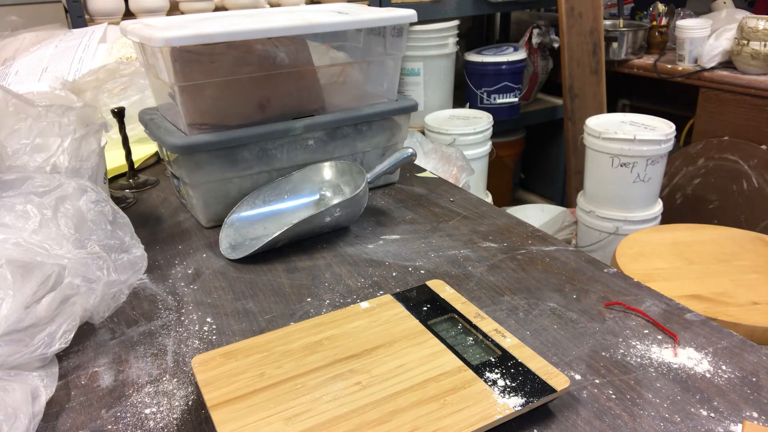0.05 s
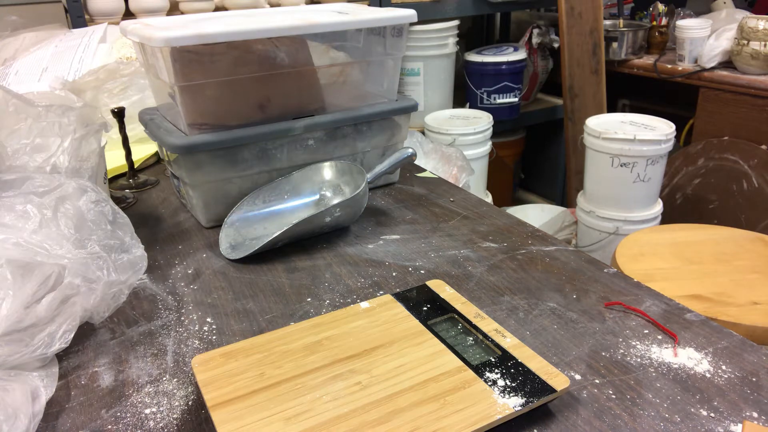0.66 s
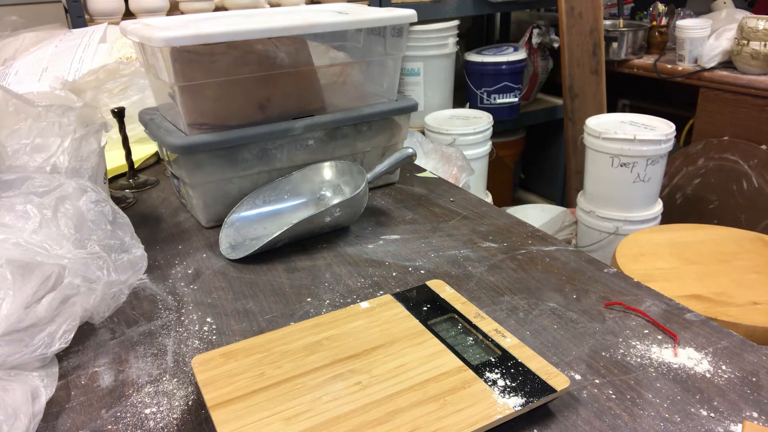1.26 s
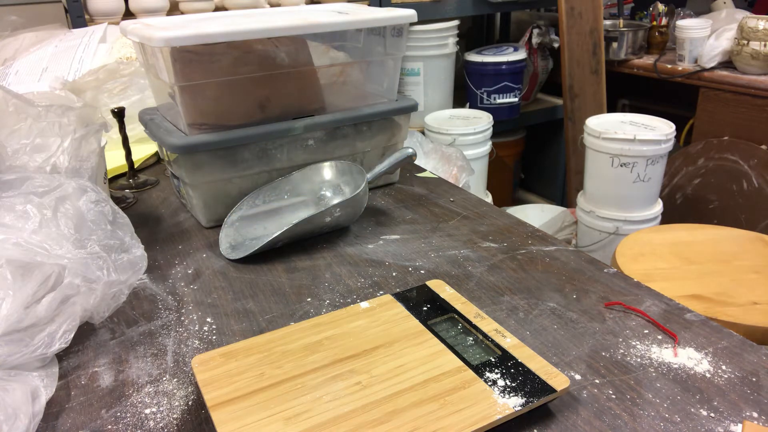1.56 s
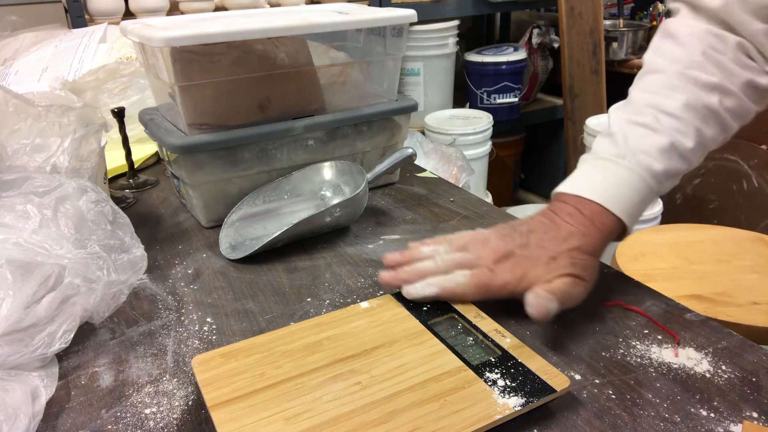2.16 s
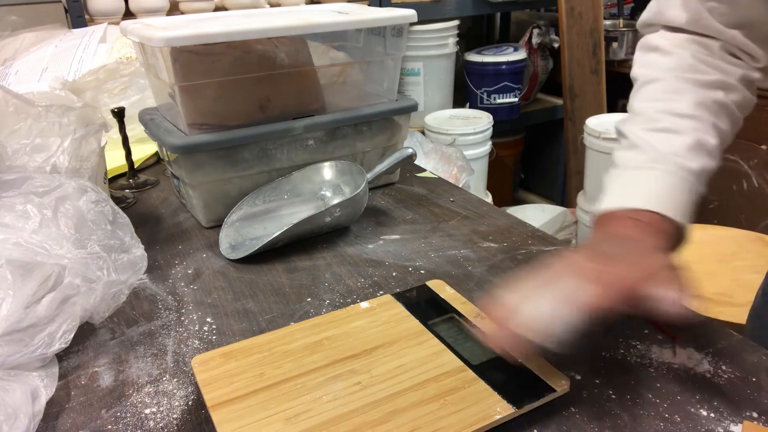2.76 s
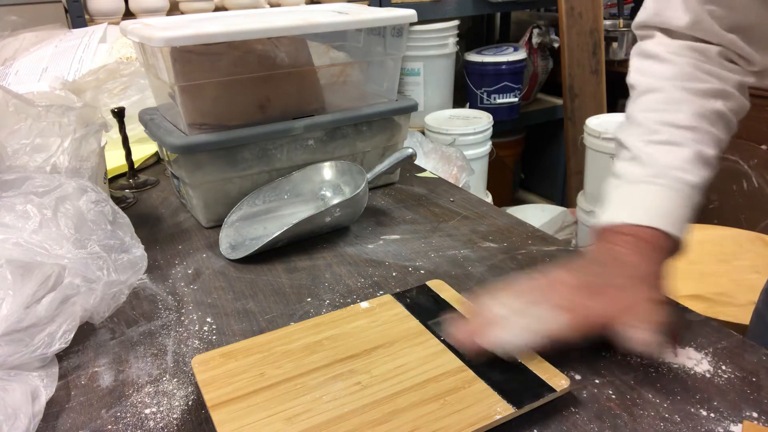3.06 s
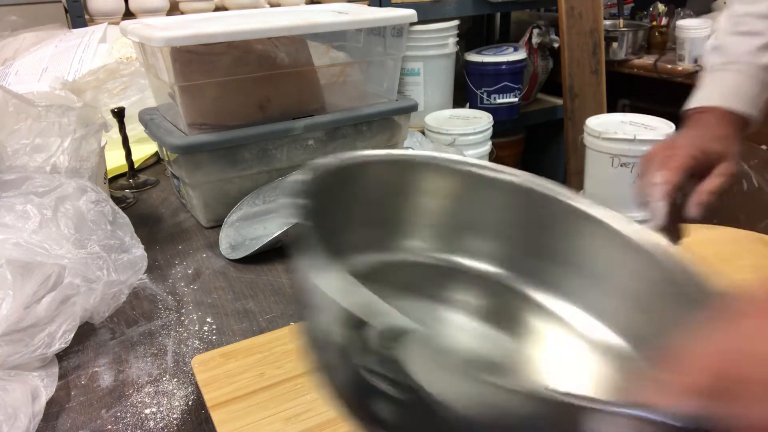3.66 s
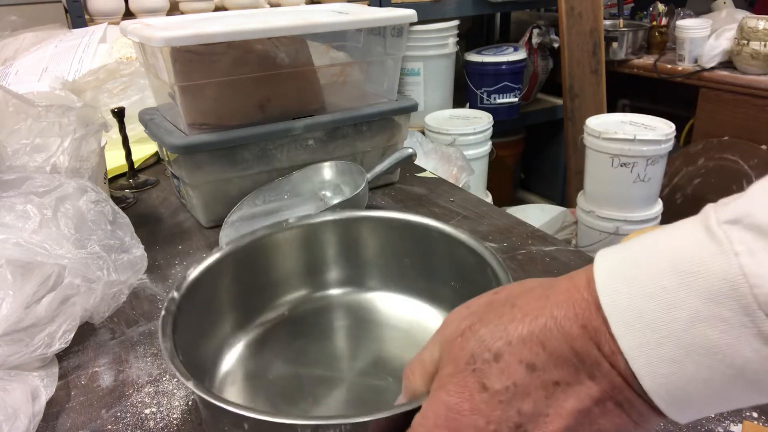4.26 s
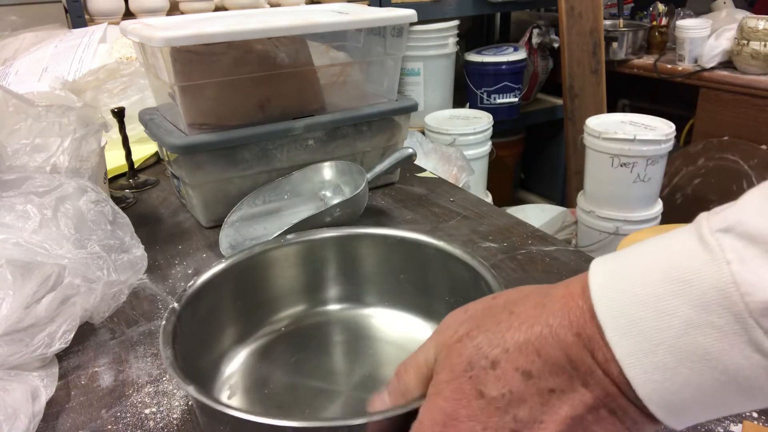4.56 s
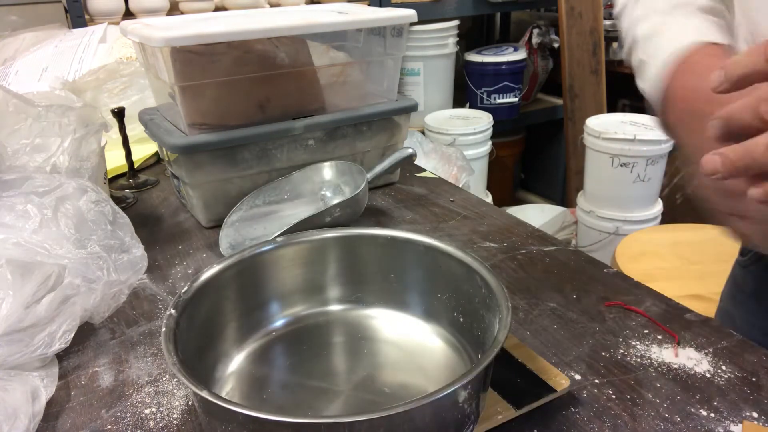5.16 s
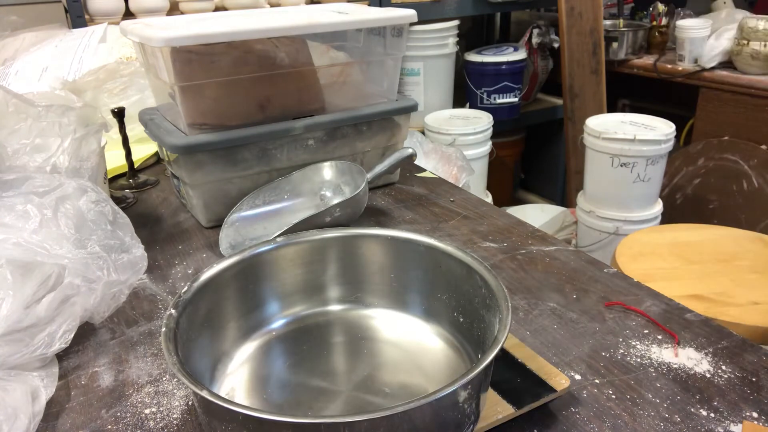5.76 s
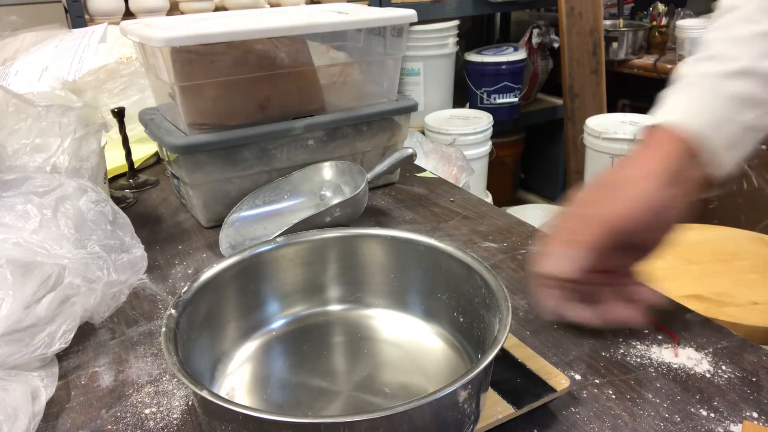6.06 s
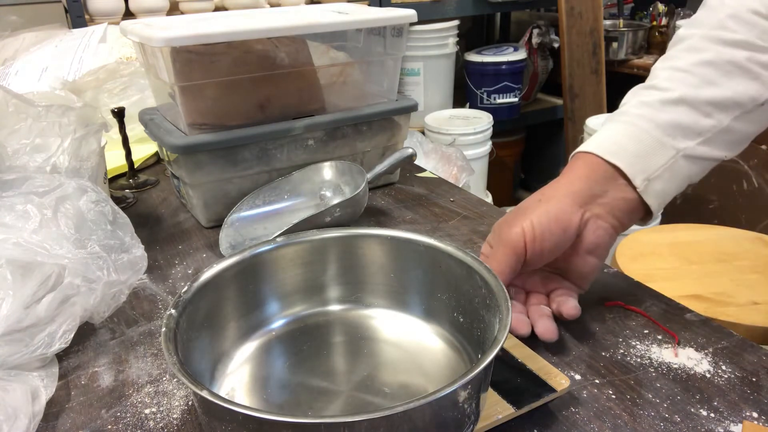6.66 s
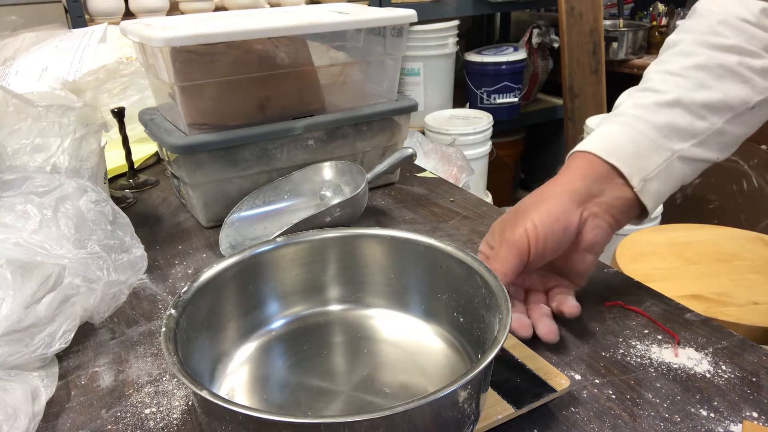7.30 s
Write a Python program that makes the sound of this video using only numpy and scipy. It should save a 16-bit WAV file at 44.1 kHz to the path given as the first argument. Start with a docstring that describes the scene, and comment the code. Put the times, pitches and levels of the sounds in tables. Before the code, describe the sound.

Someone steps up to a workbench with soft thuds, gritty scuffs and a short shoe squeak, then sweeps powder away twice with a palm. A sleeve rustles before a steel bowl lands on a scale with a thump, a damped ring and scraping. A quick swish on cloth follows, then a few sharp clicks and a short rubbery groan as the scale is nudged. The microphone is near, in a small room with faint low background noise.

```python
"""In a small, quiet workshop, a potter steps up to a bench, sleeve rustling, soles scuffing and squeaking.
A bare hand wipes powder away with a hiss. Then a steel bowl is set on a kitchen scale: it knocks, rings,
scrapes and drags the scale a little over the bench. Next the hand is brushed off on clothing.
Last, the scale clicks under a finger and its rubber feet judder as they stick and slip."""
import sys
import numpy as np
from scipy import signal
from scipy.fft import rfft, irfft, next_fast_len
from scipy.io import wavfile
from scipy.ndimage import uniform_filter1d, map_coordinates

SR = 44100
rng = np.random.default_rng(int(sys.argv[2]) if len(sys.argv) > 2 else 0)


def generate_wav(signal):
    """Clip the signal to [-1, 1] and save it as 16-bit WAV at the path in sys.argv[1]."""
    frames = np.transpose(np.atleast_2d(signal))
    scaled = np.clip(frames, -1, 1) * 32767
    pcm = np.round(scaled).astype(np.int16)
    wavfile.write(sys.argv[1], SR, pcm)


N = 327663
TIME = np.arange(N) / SR

# The tones of the steel bowl, damped by the hand.
# Each row: pitch in Hz, relative level in dB, seconds to fade by 60 dB.
BOWL_TONES = [(662, -5, .25), (745, -5, .15), (1044, -6, .18), (1141, -10, .3), (1464, 0, .3),
              (1510, -4, .2), (1798, -4, .25), (1922, -8, .3), (2160, -8, .2), (2406, -5, .24),
              (2805, -3, .18), (3192, -6, .3), (3381, -1, .26), (3957, -9, .25), (4120, -3, .1),
              (4565, -7, .2), (5216, -6, .12), (5660, -12, .2), (6718, -11, .12), (7402, -17, .08),
              (8414, -10, .07), (9243, -15, .08), (10190, -12, .05)]


def gain_of(db):
    """Turns decibels into a number to multiply a sound by."""
    return 10 ** (np.asarray(db) / 20)


def evened(x):
    """Scales a sound to an average strength (rms) of 1."""
    return x / np.sqrt(np.mean(x ** 2) + 1e-20)


def noise():
    """Fresh white noise, as long as the scene."""
    return rng.standard_normal(N)


def read(points, hz):
    """Reads between a table's rows, with frequencies spaced by octaves."""
    row_hz, value = np.transpose(points)
    return np.interp(np.log(hz + 1), np.log(row_hz + 1), value)


def add(mix, start_s, sound):
    """Mixes a sound in at the given time."""
    part = mix[round(start_s * SR):][:len(sound)]
    part += sound[:len(part)]


def colour(x, spectrum):
    """Makes each frequency louder or softer as a table says, then evens the strength to 1."""
    size = next_fast_len(2 * len(x))
    gain = gain_of(read(spectrum, np.fft.rfftfreq(size, 1 / SR)))
    return evened(irfft(rfft(x, size) * gain, size)[:len(x)])


def band(x, hz, kind, order=2):
    """Keeps the lows, the highs or a band between; a higher order cuts more sharply."""
    sections = signal.butter(order, np.minimum(hz, SR / 2 - 500), kind, fs=SR, output="sos")
    return signal.sosfilt(sections, x)


def grains(per_s, spread_db, smooth):
    """Friction: tiny slips of uneven size over a smooth hiss."""
    sizes = gain_of(spread_db * np.minimum(rng.exponential(1, N), 4)) * noise()
    slips = evened(sizes * (rng.random(N) < per_s / SR))
    return evened(slips + smooth * noise())


def resonate(x, hz, width_hz, passes=1):
    """Makes a sound ring around a pitch, which may glide; more passes sharpen the effect."""
    turn = np.exp(2j * np.pi * np.cumsum(hz * np.ones(N)) / SR)
    feedback = np.exp(-np.pi * width_hz / SR)
    for _ in range(passes):
        x = evened((turn * signal.lfilter([1 - feedback], [1, -feedback], x / turn)).real)
    return x


def ring(tones, scatter_db):
    """A struck object's fading tones; each point of contact mixes them differently."""
    t = np.arange(SR // 2) / SR
    weights = gain_of(scatter_db * rng.standard_normal(len(tones))) * rng.choice([-1, 1], len(tones))
    return sum(weight * gain_of(db - 60 * t / fade_s) * np.sin(2 * np.pi * hz * t)
               for weight, (hz, db, fade_s) in zip(weights, tones))


def burst(fade_s):
    """Noise that fades by 60 dB in fade_s, like many close tones dying together."""
    t = np.arange(SR // 2) / SR
    return rng.standard_normal(len(t)) * gain_of(-60 * t / fade_s)


def shifting(x, patchy_db, hold_s, wide_hz):
    """A rubbing contact keeps changing, so narrow bands of its sound swell and fade."""
    hz, t, spectrum = signal.stft(x, SR, nperseg=512)
    field = rng.standard_normal((400, 1500))
    places = np.meshgrid(hz / wide_hz, t / hold_s, indexing="ij")
    patches = map_coordinates(field, places, order=1, mode="wrap")
    return evened(signal.istft(spectrum * gain_of(patchy_db * patches), SR, nperseg=512)[1][:N])


def swell(rise_s, fall_s, depth_db, shape):
    """The loudness of one rub, depth_db quieter at its ends; a high shape flattens the top."""
    contact_s = 0.0038  # the contact makes and breaks this fast
    t = np.arange(0, rise_s + fall_s, 1 / SR)
    from_peak = np.interp(t, [0, rise_s, rise_s + fall_s], [1, 0, 1])
    touching = np.minimum(np.minimum(t, t[-1] - t) / contact_s, 1)
    return gain_of(-depth_db * from_peak ** shape) * touching


def swells(rows, depth_db, shape, lift_db=0):
    """The loudness over time of a table of rubs, each raised by its lift_db."""
    out = np.zeros(N)
    for (start, rise_s, fall_s, db, *_), lift in zip(rows, np.broadcast_to(lift_db, len(rows))):
        add(out, start, gain_of(db + lift) * swell(rise_s, fall_s, depth_db, shape))
    return out


def background():
    """The workshop's faint, steady, mostly low noise."""
    # Each row: frequency in Hz, relative level in dB.
    air_colour = [(15, -33), (25, -22.5), (59, 0.5), (145, -7), (185, -10), (223, -9.5), (270, -7.5),
                  (416, -16.5), (591, -14), (1070, -19), (2110, -23.5), (5000, -26.5), (5730, -25),
                  (12200, -35.5), (16000, -32.5)]
    return gain_of(-63.5) * colour(noise(), air_colour)


def sleeve():
    """The sleeve rustles softly as the arm moves."""
    # Each row: start, rise and fall in seconds, level in dB.
    rustles = [(.106, 0.0073, .2, -57), (3.42, 0.073, .11, -55), (3.56, 0.074, 0.12, -59.5),
               (3.67, 0.1, 0.15, -64.5), (3.825, 0.049, 0.052, -57), (3.915, 0.066, 0.25, -59.5),
               (4.26, 0.065, .04, -64), (5.03, 0.085, 0.26, -63.5), (5.205, 0.048, 0.07, -53),
               (5.6, 0.025, .2, -64), (6.125, 0.063, 0.062, -59), (6.6, 0.044, .07, -68),
               (7.33, .008, 0.071, -61.5)]
    # Each row: frequency in Hz, relative level in dB.
    cloth_colour = [(1180, -27), (2000, -11), (3120, -9), (3940, -0.5), (4650, -4), (7440, -0.5),
                    (9660, -9), (15100, -7), (16000, -13.5)]
    cloth = shifting(colour(noise(), cloth_colour), patchy_db=3, hold_s=0.06, wide_hz=130)
    return swells(rustles, depth_db=19, shape=1.12) * cloth


def footsteps():
    """Soles land softly, each with a low thud."""
    # Each row: start in seconds, relative level in dB, seconds to fade by 60 dB.
    steps = [(.108, -50, 0.28), (.381, -39, 0.21), (0.729, -55, 0.17), (.82, -42.5, 0.14),
             (1.149, -47.5, 0.097), (6.14, -43, 0.083)]
    # Each row: frequency in Hz, relative level in dB.
    thud_colour = [(70, -32), (130, -3.5), (185, 1.5), (300, -7), (450, -14.5), (640, -14), (900, -22),
                   (3000, -42)]
    loudness = np.zeros(N)
    for start, db, fade_s in steps:
        age = np.maximum(TIME - start, 0)
        onset = 1 - np.exp(-age / 0.0053)
        loudness += onset * gain_of(db - 4 - 60 * age / fade_s)
    return loudness * colour(noise(), thud_colour)


def scuffs():
    """Soles grind over grit; a heavily loaded sole has less treble and more rumble."""
    # Each row: start, rise and fall in seconds, level in dB, treble change in dB.
    moves = [(.61, 0.08, 0.25, -60, -6), (.84, .06, .06, -57.5, -3.5), (1.135, 0.032, 0.19, -54.5, -14.5),
             (1.325, .05, 0.08, -50.5, -5.5), (1.408, 0.0057, 0.23, -42.5, -16.5),
             (1.485, 0.04, 0.18, -43, -16), (1.911, 0.0067, 0.057, -56, 0), (1.92, 0.042, 0.14, -45.5, -2),
             (5.285, 0.042, .12, -52, -4), (5.74, 0.13, 0.087, -55.5, -6), (6.39, 0.053, 0.094, -60.5, -4),
             (6.55, 0.016, 0.037, -63, -2)]
    # Each row: frequency in Hz, relative level in dB.
    grit_colour = [(180, -22), (300, -18), (325, -8), (364, -5), (589, -15), (787, -8.5), (970, 2),
                   (1120, 0), (2240, -9), (9070, -26), (10500, -32), (14000, -29.5)]
    grit = colour(grains(per_s=2000, spread_db=3.5, smooth=1.0), grit_colour)
    coarse = evened(band(grit, 2670, "lowpass", order=4))
    fine = evened(band(grit, 2830, "highpass", order=4))
    rumble = evened(band(noise(), [130, 450], "bandpass"))
    treble_db = np.transpose(moves)[-1]
    layers = [(0.54 * coarse, 0), (fine, treble_db + 0.5), (rumble, -20 - 0.76 * treble_db)]
    return sum(sound * swells(moves, depth_db=21, shape=1.2, lift_db=lift) for sound, lift in layers)


def clicks():
    """Grit and, later, the scale click: a crack, a brief ring and reflections off the bench."""
    # Each row: start in seconds, relative level in dB, frequency in Hz above which it is dulled.
    snaps = [(0.8157, -48, 5000), (1.517, -39.5, 4000), (6.142, -50.5, 3000), (6.6739, -26.5, 4000),
             (6.6758, -25.5, 8900), (6.7837, -28, 4445), (6.785, -27, 4000), (6.809, -36, 2000),
             (6.876, -50, 2010), (7.2355, -41.5, 8000), (7.2387, -35.5, 8000), (7.2413, -41.5, 8000)]
    # The scale's case. Each row: pitch in Hz, relative level in dB, seconds to fade by 60 dB.
    case_tones = [(723, -3, 0.036), (1010, -6, 0.013), (1240, 4, 0.022), (1850, 2.5, 0.018),
                  (1966, -1.5, 0.013), (2630, -2, 0.018), (3080, 5.5, 0.011), (3980, -2.5, 0.019),
                  (4760, -9.5, 0.023), (5500, 1.5, 0.0077), (6310, 4, 0.0087)]
    out = np.zeros(N)
    for start, db, bright_hz in snaps:
        crack = burst(fade_s=0.011)
        case = ring(case_tones, scatter_db=1.0)
        reflections = band(burst(fade_s=0.078), [1100, 3300], "bandpass")
        snap = band(0.37 * crack + 0.36 * case + 0.49 * reflections, bright_hz, "lowpass", order=1)
        add(out, start, gain_of(db) * band(snap, 490, "highpass"))
    return out


def squeaks():
    """A sole squeaks as the weight turns on it."""
    # Each row: start, rise and fall in seconds, relative level in dB, pitch in Hz.
    turns = [(1.15, 0.24, 0.044, -60, 1052), (1.408, 0.0093, .02, -33.5, 990),
             (1.435, 0.049, .04, -42, 920), (1.505, 0.042, 0.1, -46.5, 942)]
    start, rise_s, _, _, pitch_hz = np.transpose(turns)
    glide_hz = np.interp(TIME, start + rise_s, pitch_hz)
    squeak = resonate(band(noise(), [800, 1200], "bandpass"), glide_hz, width_hz=24)
    return 0.74 * swells(turns, depth_db=19, shape=1.4) * squeak


def fizz(hollow_hz, full_at_hz):
    """A flatter hand raises the pitch of the hollow under it and lets out more of the finest hiss."""
    return hollow_hz / full_at_hz * evened(band(noise(), 9000, "highpass", order=3))


def wipes():
    """Powder rolls under the palm; the hollow under the hand colours the hiss."""
    # Palm strokes and fingertip flicks. Each row: start, rise and fall in seconds, level in dB.
    strokes = [(2.14, 0.23, 0.22, -37.5), (2.926, 0.11, 0.1, -36)]
    flicks = [(2.53, 0.043, 0.015, -47), (2.88, 0.016, 0.042, -59)]
    # Each row: frequency in Hz, relative level in dB.
    powder_colour = [(400, -41), (650, -17.5), (1030, -19.5), (1290, -9), (1500, -15), (1900, -9),
                     (3100, -6), (4800, -7), (6000, -2), (8000, -6.5), (10300, -9), (12700, -6),
                     (16000, -15.5)]
    # The hollow flattens through each stroke. Each row: time in seconds, pitch in Hz.
    hollow_pitches = [(2.2, 3640), (2.3, 4200), (2.35, 3300), (2.39, 5500), (2.52, 5530), (2.94, 3920),
                      (3.12, 5800)]
    hollow_hz = np.interp(TIME, *np.transpose(hollow_pitches))
    powder = colour(grains(per_s=6000, spread_db=2.5, smooth=1.3), powder_colour)
    hollow = resonate(noise(), hollow_hz, width_hz=1900, passes=2)
    hiss = powder + 0.51 * hollow + fizz(hollow_hz, full_at_hz=18000)
    swish = shifting(hiss, patchy_db=4.5, hold_s=0.035, wide_hz=111.9)
    speed = swells(strokes, depth_db=23.5, shape=1.63) + swells(flicks, depth_db=20, shape=0.96)
    # The heel of the hand hums on the bench in the first stroke.
    heel = evened(band(noise(), [1170, 1370], "bandpass"))
    press = swells([(strokes[0][0], 0.12, 0.36, -56)], depth_db=13, shape=1.7)
    return speed * swish + 0.58 * press * heel


def scale_drag():
    """Rubber feet rub the bench, which answers with a hollow rumble; the scale's plate sings along."""
    # Brief pushes make the feet creep.
    # Each row: start, rise and fall in seconds, relative level in dB, rumble change in dB.
    nudges = [(2.505, 0.049, 0.053, -54, -18), (2.2, 0.52, .8, -61.5, -3), (4.08, 0.33, 0.13, -57, 0),
              (4.3, .006, .025, -54, -10), (6.63, 0.05, 0.084, -52, -0.5), (6.68, 0.092, 0.14, -48, -0.5),
              (6.86, 0.089, 0.38, -62.5, -5)]
    # The scale slides under the bowl.
    # Each row: time in seconds, rubbing level in dB, hollow pitch in Hz, rumble level in dB.
    slide = [(4.45, -60.5, 663, -60.5), (4.626, -52, 610, -54.5), (4.726, -46, 740, -54),
             (4.758, -41.5, 637, -52), (4.806, -42.5, 657, -47), (4.954, -52, 640, -54),
             (5.002, -49, 776, -61.5), (5.258, -51, 640, -62.5), (5.292, -66, 663, -65),
             (5.31, -62, 696, -63)]
    # Each row: frequency in Hz, relative level in dB.
    bench_colour = [(350, -32), (460, -8), (540, -18), (600, 0.5), (660, 0), (720, -17.5), (880, -1.5),
                    (1000, -15), (1160, -8), (1260, -20), (2200, -26), (3000, -43)]
    times, rub_db, slide_hz, rumble_db = np.transpose(slide)
    sliding = uniform_filter1d(1.0 * ((TIME > times[0]) & (TIME < times[-1])), size=300)
    speed = sliding * gain_of(np.interp(TIME, times, rub_db))
    speed += swells(nudges, depth_db=17.5, shape=1.44)
    load = sliding * gain_of(np.interp(TIME, times, rumble_db))
    load += swells(nudges, depth_db=17.5, shape=1.44, lift_db=np.transpose(nudges)[-1])
    rub = colour(noise(), bench_colour)
    creep_hz = 639  # the pitch when the feet barely move
    hollow_hz = np.interp(TIME, times, slide_hz, left=creep_hz, right=creep_hz)
    hollow = resonate(band(noise(), 480, "highpass", order=6), hollow_hz, width_hz=105, passes=2)
    rumble = evened(band(noise(), [220, 420], "bandpass", order=3))
    plate = evened(band(noise(), [3430, 3680], "bandpass"))
    plate_share = gain_of(-12.5) * (abs(load) / load.max()) ** 0.34  # grows with the push
    return speed * (0.5 * rub + 0.8 * hollow) + load * (0.57 * rumble + plate_share * plate)


def steel_ring():
    """The bowl is not quite round, so each of its tones comes as a close pair."""
    twins = [(hz * rng.uniform(0.96, 1.02), db, fade_s) for hz, db, fade_s in BOWL_TONES]
    return ring(BOWL_TONES, scatter_db=1.5) + 0.6 * ring(twins, scatter_db=1.5)


def bowl_rubbing():
    """Fingers shift on the carried bowl, then its base scrapes the scale; both make the steel sing."""
    # In both tables, each row: start, rise and fall in seconds, relative level in dB.
    finger_shifts = [(3.44, .06, 0.28, -69), (3.78, .1, .3, -71)]
    base_scrapes = [(4.38, 0.09, 0.16, -47), (4.53, 0.067, 0.069, -43.5), (4.72, 0.032, 0.023, -43.5),
                    (4.594, 0.18, 0.2, -55.5), (4.83, 0.034, 0.054, -45.5)]
    grip = swells(finger_shifts, depth_db=7, shape=1.2)
    slips = grains(per_s=1500, spread_db=4.5, smooth=0.71)
    slips *= swells(base_scrapes, depth_db=17.5, shape=0.98)
    steel = steel_ring()
    singing = signal.fftconvolve(0.086 * slips + grip * noise(), steel / np.linalg.norm(steel))[:N]
    # Soft fingertips favour the lowest tone.
    hum = resonate(band(noise(), [560, 760], "bandpass"), BOWL_TONES[0][0], width_hz=7.2)
    rasp = band(band(slips, 850, "highpass"), 10000, "lowpass", order=1)
    scrape = shifting(rasp, patchy_db=6.5, hold_s=0.095, wide_hz=110.3)
    return singing + 0.73 * grip * hum + 0.83 * np.std(slips) * scrape


def bowl_knocks():
    """The bowl knocks on the scale: steel rings, the plate rattles and the landing thumps the bench."""
    # Each row: start in seconds, relative level in dB, frequency in Hz above which it is dulled.
    knocks = [(4.3635, -28.5, 5500), (4.3682, -23, 1540), (4.3775, -32, 2500), (4.493, -37.5, 7000),
              (4.593, -39, 9900), (4.631, -42, 10200), (4.748, -41.5, 12000), (4.855, -46, 12000),
              (4.874, -49, 10000)]
    out = np.zeros(N)
    for start, db, bright_hz in knocks:
        steel = gain_of(-20) * steel_ring()
        crack = 0.77 * burst(fade_s=0.031)
        rattle = gain_of(-15.5) * burst(fade_s=0.2)
        blow = band(steel + crack + rattle, bright_hz, "lowpass", order=1)
        add(out, start, gain_of(db) * band(blow, 400, "highpass"))
    thump = band(burst(fade_s=0.13), [110, 420], "bandpass")
    add(out, knocks[0][0], gain_of(-24) * thump)
    return out


def judder():
    """The rubber feet stick and slip: short, rough groans that sink as the scale comes to rest."""
    # Each row: start, rise and fall in seconds, level in dB, then the slips per second
    # and the strongest frequency in Hz that the groan begins with.
    groans = [(4.72, 0.097, 0.041, -46, 175, 397), (6.795, 0.0068, 0.017, -28, 205, 210),
              (6.805, 0.0137, 0.0372, -31, 176, 595), (6.826, 0.049, 0.0445, -39.5, 200, 322)]
    out = np.zeros(N)
    harmonics = np.arange(1, 8)[:, None]
    for start, rise_s, fall_s, db, slips_per_s, strongest_hz in groans:
        push = swell(rise_s, fall_s, depth_db=17, shape=1.7)
        slowing = np.linspace(0, 1, len(push)) ** 1.3
        jitter = 1 + 0.057 * evened(uniform_filter1d(noise(), size=250))[:len(push)]
        rate = slips_per_s * (1 - 0.498 * slowing) * jitter
        centre_hz = strongest_hz * (1 - 0.73 * slowing)
        octaves_away = np.log2(harmonics * rate / centre_hz)
        weights = 1 / (1 + (octaves_away / 0.59) ** 2)
        weights /= 1 + (harmonics * rate / 760) ** 8  # little is left above 760 Hz
        tones = np.sin(2 * np.pi * harmonics * np.cumsum(rate) / SR)
        groan = (weights * tones).sum(0) / np.linalg.norm(weights, axis=0)
        add(out, start, gain_of(db) * push * groan)
    return out


def hand_brush():
    """A cupped hand pats clothing and sweeps over it; the hollow of the hand gives a sliding pitch."""
    # In both tables, each row: start, rise and fall in seconds, level in dB.
    sweeps = [(5.42, 0.12, .11, -43)]
    pats = [(5.45, .017, 0.066, -55.5)]
    # Each row: time in seconds, pitch of the hollow in Hz.
    hollow_pitches = [(5.46, 2300), (5.505, 3100), (5.555, 2140), (5.585, 3280), (5.63, 5040)]
    # Each row: frequency in Hz, relative level in dB.
    weave_colour = [(880, -52), (1500, -18), (1940, -35), (3620, 4), (4640, -4.5), (5380, 2), (13500, -8),
                    (16000, -10)]
    hollow_hz = np.interp(TIME, *np.transpose(hollow_pitches))
    hollow = resonate(noise(), hollow_hz, width_hz=1100, passes=2)
    friction = grains(per_s=5000, spread_db=3.5, smooth=1.7)
    weave = colour(band(friction, 2900, "highpass", order=4), weave_colour)
    hiss = band(weave + 0.5 * hollow, 1200, "highpass", order=4) + fizz(hollow_hz, full_at_hz=9000)
    brush = shifting(hiss, patchy_db=1.5, hold_s=0.056, wide_hz=227)
    pat = evened(band(noise(), [520, 760], "bandpass"))
    return swells(sweeps, depth_db=21, shape=3.7) * brush + swells(pats, depth_db=18, shape=1.1) * pat


def room(x):
    """Dense echoes from shelves and walls; the treble dies away first."""
    # Each row: frequency in Hz, seconds to fade by 60 dB.
    fade_times = [(150, 0.4), (700, 0.39), (3000, 0.34), (12000, 0.089)]
    echoes = rng.standard_normal(SR // 2) * (np.arange(SR // 2) / SR > 0.006)
    hz, t, spectrum = signal.stft(echoes, SR, nperseg=256)
    fading = gain_of(-60 * t / read(fade_times, hz)[:, None])
    tail = signal.istft(spectrum * fading, SR, nperseg=256)[1]
    return signal.fftconvolve(x, tail / np.linalg.norm(tail))[:N]


def scene():
    """Soft and hard sounds with their echoes, over the steady background, in one channel."""
    soft = sleeve() + footsteps() + scuffs() + squeaks()
    soft += wipes() + scale_drag() + judder() + hand_brush()
    hard = clicks() + bowl_rubbing() + bowl_knocks()
    echoes = room(gain_of(-15) * soft + gain_of(-14) * hard)
    return (background() + soft + hard + echoes)[None]


def record(dry):
    """Cuts off the very highest treble."""
    treble_cut = signal.firwin(511, 15950, window=("kaiser", 9), fs=SR)
    return signal.oaconvolve(dry, treble_cut[None], "same")


dry = scene()
out = record(dry)
generate_wav(out)
```